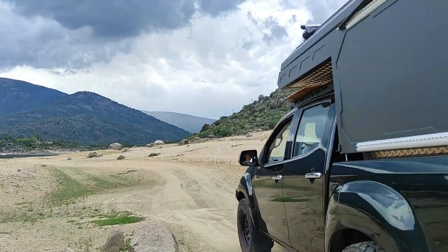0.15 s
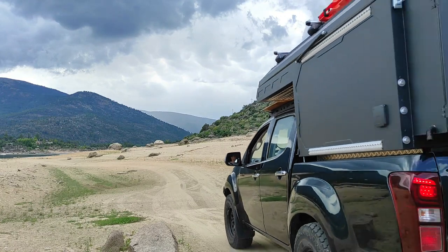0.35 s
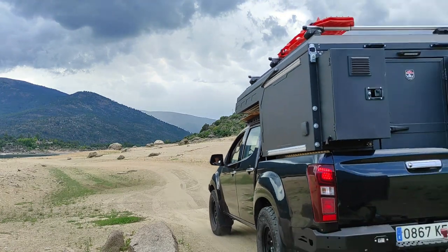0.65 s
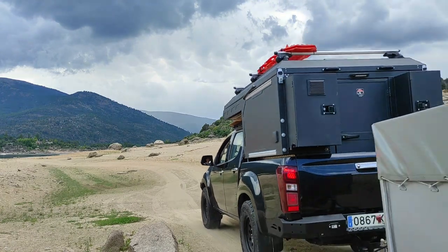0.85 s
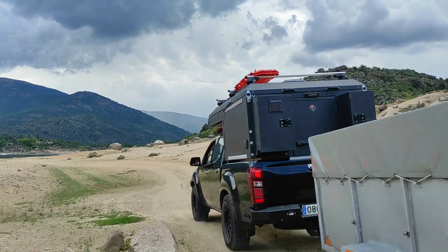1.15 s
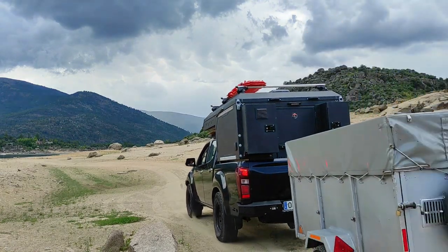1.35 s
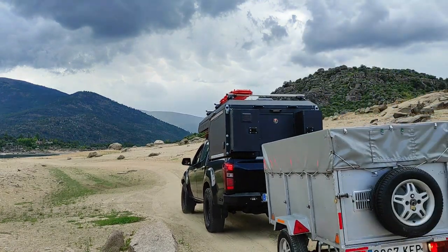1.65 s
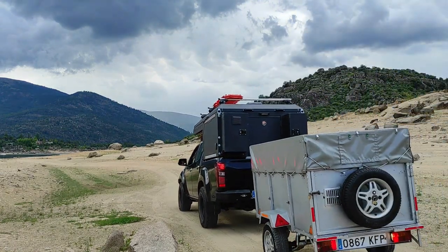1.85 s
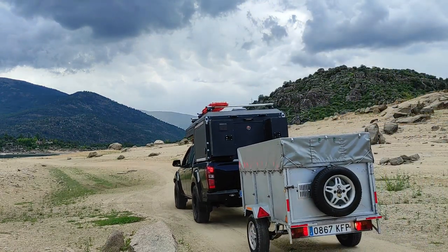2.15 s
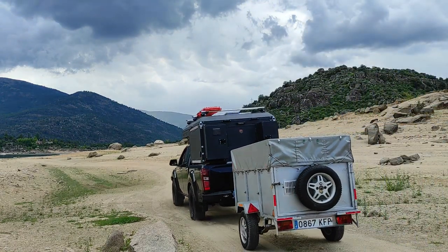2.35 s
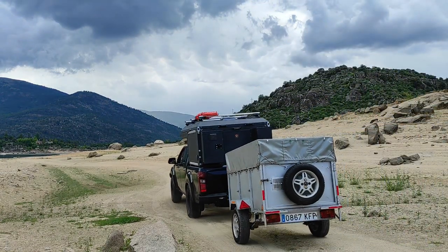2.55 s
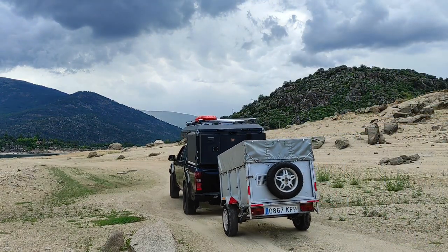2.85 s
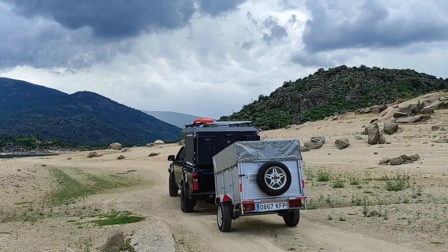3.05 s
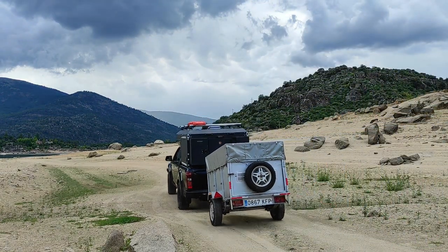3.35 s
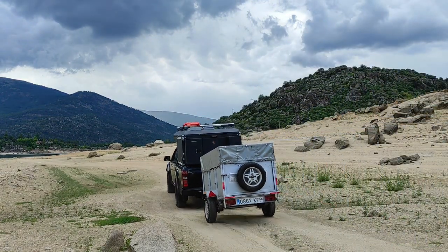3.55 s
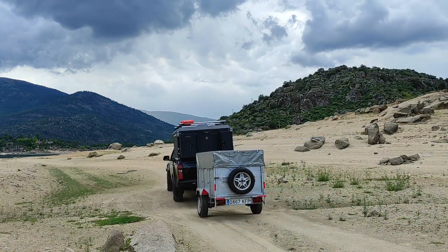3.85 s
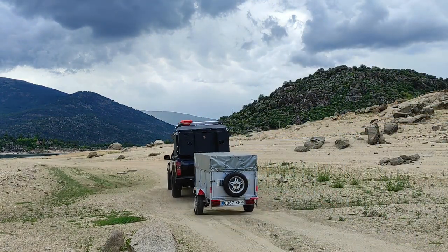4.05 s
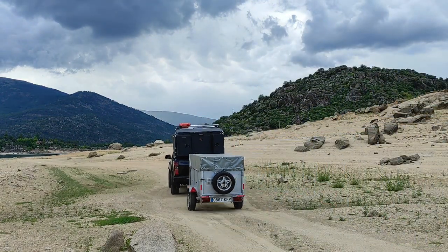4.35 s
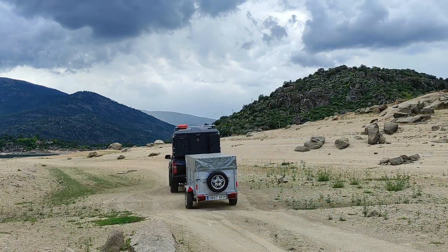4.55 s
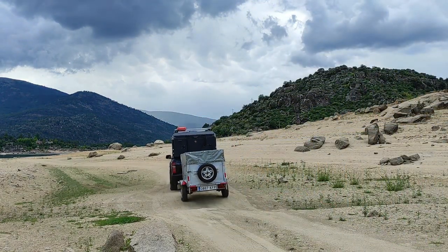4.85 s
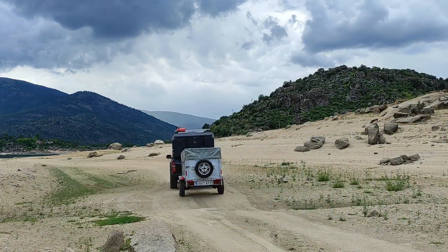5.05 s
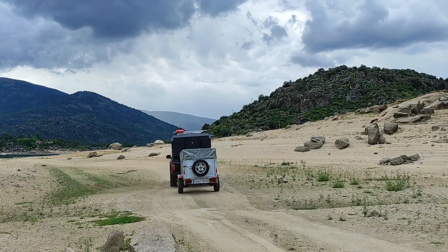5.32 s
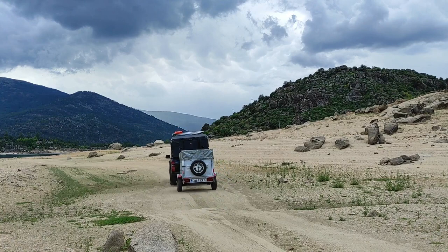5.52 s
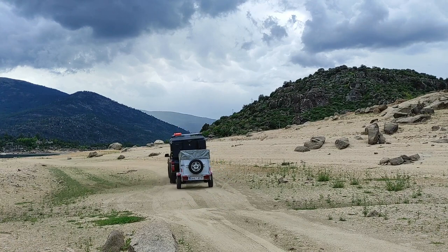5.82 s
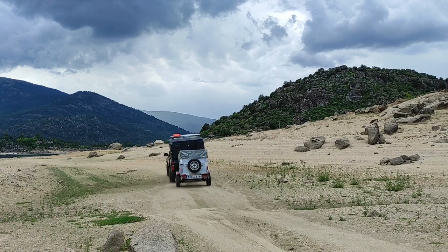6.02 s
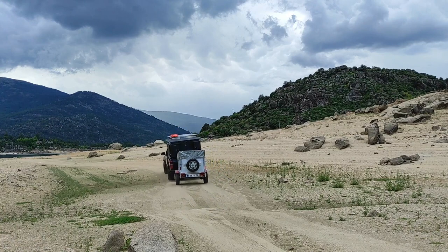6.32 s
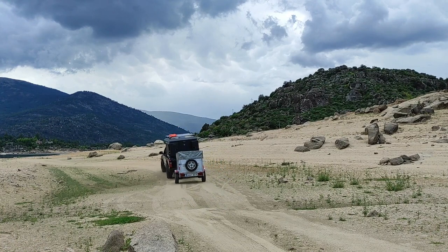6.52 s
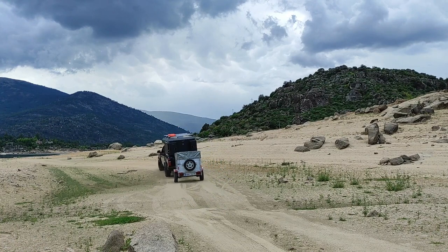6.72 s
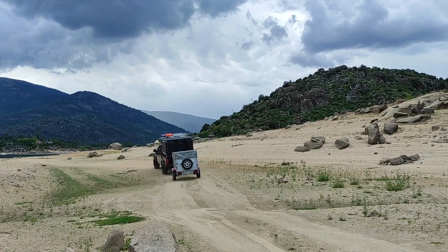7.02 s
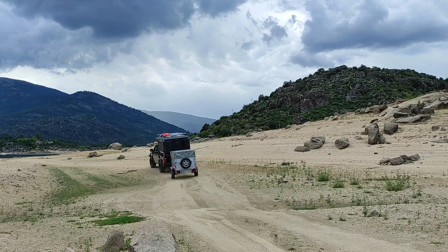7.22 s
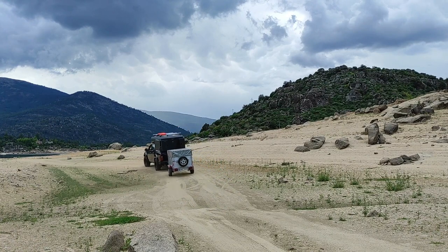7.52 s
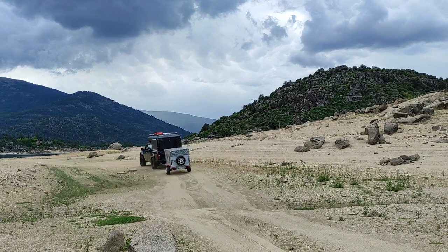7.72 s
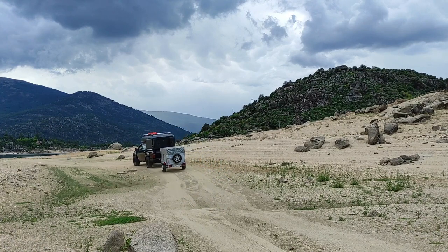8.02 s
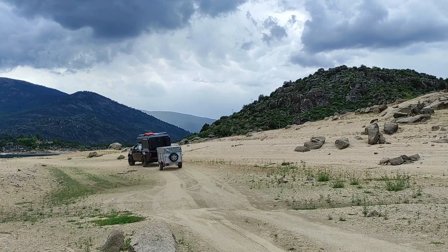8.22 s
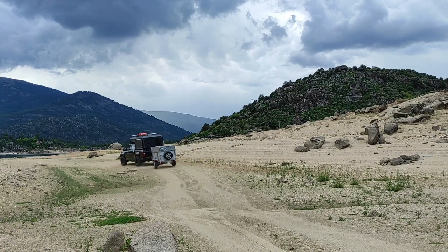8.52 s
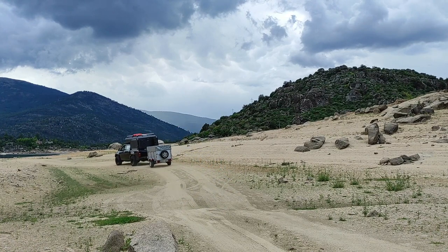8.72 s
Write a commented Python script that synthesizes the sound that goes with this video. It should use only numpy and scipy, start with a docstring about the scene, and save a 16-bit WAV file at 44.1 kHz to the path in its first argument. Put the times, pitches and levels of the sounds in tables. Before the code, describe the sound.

Outdoors in open country, a pickup passes close to a handheld phone, tyres crunching gravel over soft wind. A deep thud and hollow trailer boom come almost at once, then lighter clinks as it recedes. About four seconds in, ruts set off a dense burst of metallic slams and boxy booms lasting over a second, before quieter crunch, a faint diesel hum and a few distant knocks.

```python
"""A pickup tows a light sheet-metal trailer away from a phone along a sandy gravel track in open country.
Tyre crunch is noise modulated by random stone impacts; the diesel hum is a sum of crankshaft orders.
The trailer box booms as a bank of struck panel resonances, and loose fittings rattle as short noise bursts.
Decaying sines make tyre thuds and the short rings of stones and slammed fittings; thin tones, a faint
engine hum line and high squeals, swell and fade, and low noise is wind at the microphones."""
import sys
import numpy as np
from scipy import signal
from scipy.fft import rfft, irfft
from scipy.io import wavfile
from scipy.ndimage import uniform_filter1d, map_coordinates

SR = 44100
rng = np.random.default_rng(int(sys.argv[2]) if len(sys.argv) > 2 else 0)


def bounce(signal):
    """Save signal as a 16-bit WAV file at the path given by the first command-line argument."""
    frames = np.transpose(np.atleast_2d(signal))
    limited = np.clip(frames, -1, 1)
    pcm = np.round(limited * 32767).astype(np.int16)
    wavfile.write(sys.argv[1], SR, pcm)


N = 391608
T = np.arange(N) / SR  # time axis, s
HZ = np.maximum(np.arange(N // 2 + 1) * SR / N, 1)  # frequency axis, kept above zero

# Spectra are relative, because colour() normalises the filtered noise.
# Gravel crunch spectrum: frequency_hz, density_db [dB per Hz]
GRAVEL_SPECTRUM = [(50, -35), (100, -8.5), (200, 0.5), (330, -8.5), (500, -4), (950, -3), (1400, -7.5),
                   (2600, -14), (3300, -22.5), (4200, -38), (6500, -58), (10000, -100)]
# Sand hiss through the phone's port resonance: frequency_hz, density_db [dB per Hz]
GRIT_SPECTRUM = [(1500, -12), (3000, -2), (4200, -4), (5600, -3), (6500, -3), (7400, 1), (8400, -7.5),
                 (9800, -24.5), (11500, -23.5), (13000, -29), (15800, -46)]
# Low tyre rumble spectrum: frequency_hz, density_db [dB per Hz]
RUMBLE_SPECTRUM = [(20, -73), (40, -32), (60, 3), (75, 7.5), (120, 2), (200, -40), (400, -110)]
# Short rings: stones crack and slammed fittings clink: start_s, peak_db, pitch_hz
SHORT_RINGS = [(0.416, -14, 1520), (0.449, -16, 2570), (0.453, -19, 1380), (0.717, -17, 1500),
               (0.744, -17, 2600), (0.877, -11, 930), (1.28, -21, 990), (1.3958, -17, 1365),
               (1.543, -16.5, 1317), (1.9914, -21.5, 1650), (2.2915, -28, 3560), (2.2927, -23, 1500),
               (2.4044, -22.5, 1030), (2.5784, -23.5, 1410), (2.6379, -22.5, 1060), (4.19, -30, 2740),
               (4.363, -28, 7240), (4.379, -27, 1600), (4.393, -16, 8060), (4.406, -12, 7000),
               (4.849, -20, 7300), (4.877, -16, 7900), (4.9, -31, 7200), (4.926, -21, 7700),
               (4.928, -14.5, 1510), (5.14, -15.5, 5550), (5.142, -24, 3240), (5.215, -27, 5000),
               (5.276, -25, 7640), (5.323, -24, 7530), (5.493, -25, 8000), (5.453, -23, 2408),
               (7.912, -33, 1590)]
# How hard the ruts shake the rig: time_s, level_db
SHAKE_LEVEL = [(0.0, -33.5), (0.64, -42.5), (1.66, -43), (1.9, -44.5), (2.9, -45), (3.61, -44.5),
               (4.08, -36.5), (4.35, -34), (4.62, -36.5), (4.95, -34), (5.09, -35.5), (5.44, -30),
               (5.81, -40), (6.5, -43.5), (7.6, -45), (8.06, -41.5), (8.35, -41), (8.6, -41), (8.88, -42)]
# Crankshaft speed: time_s, speed_hz
CRANK_SPEED = [(0, 29.9), (5.5, 29.5), (5.85, 28.64), (6.1, 29.25), (6.46, 29.04), (6.54, 31.6),
               (6.72, 28.45), (7.8, 29.48), (8.88, 29)]
# Engine hum, sixth order: time_s, level_db
HUM_LEVEL = [(2.6, -51), (3.3, -46), (5.4, -44), (5.75, -56), (5.87, -36.5), (6.4, -40), (6.58, -44.5),
             (6.68, -57), (7.25, -54), (7.4, -46.5), (7.9, -45.5), (8.05, -50.5), (8.88, -49)]
# Brief dip of the low hum: centre_s, width_s, depth_db
LOW_HUM_DIP = (6.97, .15, -11)
# Wind gusts: time_s, level_db
WIND_LEVEL = [(0.0, -31), (1.16, -31.5), (1.5, -32.5), (1.76, -34), (1.88, -42.5), (2.07, -29.5),
              (2.17, -38.5), (2.3, -31.5), (2.4, -40.5), (3.46, -39), (4.03, -27.5), (4.53, -34),
              (4.75, -29), (6.1, -40), (6.75, -41.5), (8.88, -44)]
# Wind spectrum: frequency_hz, density_db [dB per Hz]
WIND_SPECTRUM = [(8.8, -35), (15, 7), (32, -2.5), (59, -2.5), (113, -12), (172, -10), (200, -9), (260, -55),
                 (440, -120)]
# Jolts that boom in the trailer box: start_s, reference_db, struck_panel_hz
BOX_JOLTS = [(0.462, -20.5, 270), (0.711, -13.5, 315), (0.731, -7, 262), (0.746, -14, 350),
             (0.792, -17, 225), (0.816, -15.5, 264), (0.87, -20, 345), (1.263, -26.5, 256),
             (2.411, -27, 277), (2.577, -25, 250), (4.128, -28, 240), (4.235, -18.0, 310),
             (4.259, -23, 241), (4.28, -25, 230), (4.385, -11, 261), (4.398, -7.5, 204), (4.41, -5.5, 292),
             (4.44, -12, 322), (4.492, -23, 214), (4.679, -17, 260), (4.722, -14.5, 292), (4.743, -15, 260),
             (4.768, -16.5, 250), (4.852, -15.5, 298), (4.931, -14.5, 237), (4.972, -10.5, 293),
             (5.001, -21, 298), (5.162, -14, 282), (5.195, -13, 243), (5.257, -13, 346), (5.284, -8, 279),
             (5.315, -12.5, 246), (5.329, -17, 255), (5.355, -11.5, 276), (5.554, -9, 304),
             (5.627, -18, 282), (5.689, -16.4, 251), (6.711, -22.5, 284), (7.292, -23, 263),
             (7.921, -17, 294), (8.077, -25, 270), (8.453, -22, 277.8), (8.57, -23.5, 245),
             (8.617, -22.5, 271)]
# Panel resonances of the box: centre_hz, width_hz, gain_db
PANEL_MODES = [(133.4, 42, -4), (177, 32.4, -0.5), (223, 29.7, 0.5), (252, 24.6, 2.5), (284, 47.5, -1),
               (360.4, 51, -4), (402.6, 39.6, -5), (501, 101, -10.5), (703, 780, -22)]
# Slams of loose fittings: start_s, reference_db, knock_over_reference_db
SLAMS = [(0.4494, -28.5, 17), (0.7154, -25.5, 25.5), (0.7393, -8, 6), (0.875, -30, 19.5), (0.9544, -25, 12),
         (1.0994, -20, -15), (1.2394, -19, -11), (1.28, -26.5, 12.5), (1.395, -25, 9.5), (1.542, -34, 10),
         (1.99, -49, 5), (2.2144, -30.5, 7), (2.2902, -32.5, 7), (2.5718, -29, 7.5), (4.0537, -28, -6),
         (4.078, -17, -7), (4.1205, -24.5, -10), (4.157, -25, -4), (4.1893, -22.5, -8), (4.2168, -32, 1),
         (4.2344, -22.5, -6), (4.362, -32, -18), (4.3794, -16, 0), (4.3933, -5, -10), (4.4094, -13, -15),
         (4.4394, -17, 7.5), (4.617, -20.5, -21), (4.6614, -21.5, -15), (4.7134, -17.5, 1),
         (4.7526, -25, -2), (4.848, -17.5, -1), (4.875, -9.5, -11), (4.9257, -16, 0), (5.1397, -11.5, -3.5),
         (5.1544, -12.5, 1), (5.1744, -16, 4), (5.2145, -24, -11), (5.2425, -18.5, 5.5), (5.2729, -12, -2),
         (5.3044, -15.5, 4), (5.3205, -14.5, 2), (5.4535, -25, -19), (5.4926, -29.5, -20),
         (5.5238, -23.5, 6), (5.5452, -23, 12.5), (5.556, -19.5, 4), (6.2417, -33.5, -13),
         (6.9042, -37, -10), (7.055, -36, 10.5), (7.2893, -30.5, -3), (7.4076, -35, -1), (7.912, -28, -1),
         (7.9678, -32, 6), (8.4143, -28, 5), (8.16, -39, 5), (8.565, -29, -1)]
# Bright clang spectrum: frequency_hz, density_db [dB per Hz]
CLANG_SPECTRUM = [(880, -42), (1500, 5.5), (1690, -1.5), (2820, -2.5), (4220, -8.5), (5780, -6.5),
                  (7770, 1), (9850, -21.5), (11600, -24), (13200, -28), (13900, -55), (15800, -39)]
# Dull knock spectrum: frequency_hz, density_db [dB per Hz]
KNOCK_SPECTRUM = [(150, -65), (400, 17), (700, 13), (1500, 6.5), (2400, -2.5), (4000, -28), (9000, -95)]
# A wheel drops into a hole and the tyre thuds: start_s, peak_db, pitch_hz, t60_s
TYRE_THUDS = [(.727, -4, 75.6, 0.18), (2.051, -15, 59, 0.084), (2.288, -19.5, 60, 0.1),
              (5.29, -23, 74.5, 0.98)]
# Thin tones: a faint engine hum line and high squeals swell and fade: start_s, end_s, pitch_hz, level_db
THIN_TONES = [(1.47, 1.68, 13440, -63), (3.1, 4.5, 540, -52), (4.03, 4.23, 6480, -54)]
# Likeness of the two ports: frequency_hz, share [0-1]
PORT_LIKENESS = [(25, 0), (60, 1), (130, 0.92), (300, 1), (640, 0.81), (1400, 0.71), (3000, 0.09),
                 (6000, 0.21)]
# Difference in colour of the two ports: frequency_hz, left_over_right_db
LEFT_OVER_RIGHT = [(60, 12), (110, 8.5), (200, 11), (380, 8.5), (700, 8), (1290, 7), (2380, 3.5), (4400, 3),
                   (8120, -7), (15000, 4)]

# The rig starts to the left and draws away, drifting slowly to the right.
SPEED_M_S, PASSES_S, BESIDE_M, DRIFT_M_S, TRAILER_BEHIND_M = 3.31, 0.088, 2.28, 0.26, 1.96
PORTS_APART_M, LEFT_LATE_S, SOUND_M_S = 0.12, .00007, 343
CALM_DB = -45  # reference for both shake and crunch
TYRES_1M_DB, TRAILER_TYRES_DB, FAR_HUSH_DB = -24.5, -5, -53.5  # truck tyres, trailer against truck, distant floor
TYRES_PER_SHAKE, RUMBLE_PER_SHAKE = 0.56, 1  # dB gained per dB of shake
GRIT_DB, GRIT_PER_CRUNCH, RUMBLE_DB = -56.5, 1.15, -53  # levels at calm; hiss fades faster with distance
PINGS, PING_DB, PING_LOW_HZ, PING_OCTAVES = 250, 7, 701.5, 2.2  # small stones; level against the crunch
SHORT_RING_T60_S = 0.022
# Order 2 swells, then order 3 takes over.
LOW_HUM_DB, LOW_HUM_SWELL_DB_S, LOW_HUM_JUMPS_S, LOW_HUM_AFTER_DB = -44.5, 1, 6.5, -44.5
CREST_DB = 9  # peaks of a noise burst above its rms
PUSH_DB, LOAD_DB, SHUDDER_DB = 18.5, -14, -1.5  # first push, shaken load and box shudder, against the jolt
PANEL_RING_DB, PANEL_RING_T60_S = 7, 0.067  # ring of the struck panel, against the jolt
SMALL_RATTLES, SMALL_SPREAD_DB, SMALL_KNOCK_DB = 450, 3, -6.5
SMALL_OVER_SHAKE_DB, SMALL_PER_SHAKE = -50.5, 1.58  # level in the calm, dB gained per dB of shake
CLANG_PATCHY_DB, CHATTER_DB = 3, 3  # spread between bands, spread within a slam
CRACK_DB, CRACK_LOW_HZ, CRACK_HIGH_HZ = 4.5, 600, 3960  # dry first contact of each slam
TOP_HZ = 15850


def undb(db):
    """Decibel law: twenty decibels are a factor of ten in amplitude."""
    return 10 ** (np.asarray(db) / 20)


def unit(x):
    """Normalisation to a root-mean-square amplitude of one."""
    return x / np.sqrt(np.mean(x ** 2))


def shape(table):
    """Logarithmic interpolation: a (Hz, value) table read at every frequency, straight on a log axis."""
    hz, value = np.transpose(table)
    return np.interp(np.log(HZ), np.log(np.maximum(hz, 1)), value)


def colour(x, table):
    """Spectral shaping: multiplication in the frequency domain filters the sound, then rms is set to one."""
    return unit(irfft(rfft(x) * undb(shape(table)), N))


def curves(table):
    """Linear interpolation in time of every column after the first."""
    s, *columns = np.transpose(table)
    return [np.interp(T, s, c) for c in columns]


def noise():
    """Incoherence: two unrelated noises serve the direct path and what the ground scatters."""
    return rng.standard_normal((2, N))


def walk(rate):
    """Slow random modulation: levels held 1 / rate seconds and slewed twice, with a spread near 1."""
    hold = int(SR / rate)
    steps = np.repeat(rng.standard_normal(N // hold + 1), hold)
    return 1.61 * uniform_filter1d(uniform_filter1d(steps, hold), hold)[:N]


def bursts(times, peak_db, t60, rise, tail_db=-90):
    """Exponential decay: a short rise, a fall and a weaker tail three times longer; powers of blows add."""
    t = T[:int(SR * 3 * t60)]
    onset = (1 - np.exp(-t / rise)) ** 2
    fall, tail = undb(-120 * t / t60), undb(-40 * t / t60)  # as power
    power = np.zeros(N + len(t))
    for s, db, after_db in np.broadcast(times, peak_db, tail_db):
        start = int(s * SR)
        power[start:start + len(t)] += undb(2 * db) * onset * (fall + undb(2 * after_db) * tail)
    return np.sqrt(power[:N])


def stones(rate, spread_db, tail):
    """Random impact process: many small hits and few large ones, each with a short decaying tail."""
    sizes = undb(spread_db * np.minimum(rng.exponential(size=N), 3))
    hits = (rng.random(N) < rate / SR) * sizes
    decayed = signal.lfilter([1], [1, -np.exp(-1 / (tail * SR))], hits)
    return unit(uniform_filter1d(decayed, size=24))


def rings(times, peak_db, hz, t60, rise, wobble):
    """Damped vibration: each blow starts a decaying sine, roughened by a phase wobble in radians."""
    out = np.zeros(N + SR)
    for s, db, f, fade in np.broadcast(times, peak_db, hz, t60):
        i = int(s * SR)
        t = T[:int(SR * min(fade, .9))][:N - i]
        envelope = undb(db - 60 * t / fade) * (1 - np.exp(-t / rise))
        out[i:i + len(t)] += envelope * np.sin(2 * np.pi * f * t + wobble[i:i + len(t)])
    return out[:N]


def tyres(truck_m, trailer_m, shake_db):
    """Inverse-distance law: crunch of truck and trailer tyres, with hiss, rumble, stone pings and short rings."""
    rough_db = shake_db - CALM_DB
    near = np.hypot(1 / truck_m, undb(TRAILER_TYRES_DB) / trailer_m)
    crunch_db = 20 * np.log10(np.hypot(undb(TYRES_1M_DB) * near, undb(FAR_HUSH_DB)))
    crunch_db = crunch_db + TYRES_PER_SHAKE * rough_db
    grit_db = GRIT_DB + GRIT_PER_CRUNCH * (crunch_db - CALM_DB)
    # crunch and hiss share part of their flicker through the ground
    ground = walk(9.1)
    crack = stones(150, 3.6, 0.0039)
    crunch = colour(noise() * (1 + 0.24 * crack) * undb(.5 * ground + 1.65 * walk(16)), GRAVEL_SPECTRUM)
    grains = stones(110, 1.0, 0.0075)
    grit = colour(noise() * (1 + 0.35 * grains) * undb(.5 * ground + 0.36 * walk(24.47)), GRIT_SPECTRUM)
    rumble = colour(noise(), RUMBLE_SPECTRUM)

    when, pitch, size = rng.random((PINGS, 3)).T
    ping_hz = PING_LOW_HZ * 2 ** (PING_OCTAVES * pitch)
    ping_db = crunch_db[(when * N).astype(int)] + PING_DB + 6.1 * size
    ping_db += shape(GRAVEL_SPECTRUM)[(ping_hz * N / SR).astype(int)]
    pings = np.transpose([when * N / SR, ping_db, ping_hz])
    # a stone rings only roughly, so its pitch wobbles fast
    short_rings = rings(*np.vstack([SHORT_RINGS, pings]).T, SHORT_RING_T60_S, 0.0015, 1.07 * walk(900))
    bed = crunch * undb(crunch_db) + grit * undb(grit_db)
    return bed + rumble * undb(RUMBLE_DB + RUMBLE_PER_SHAKE * rough_db) + short_rings


def engine():
    """Harmonic synthesis: engine orders are multiples of crankshaft speed, wavering in level and phase."""
    turn = 2 * np.pi * np.cumsum(curves(CRANK_SPEED)[0]) / SR
    after = 1 / (1 + np.exp((LOW_HUM_JUMPS_S - T) / 0.05))
    dip_s, width_s, dip_db = LOW_HUM_DIP
    dip = dip_db * np.exp(-((T - dip_s) / width_s) ** 2)
    second = (1 - after) * undb(LOW_HUM_DB - LOW_HUM_SWELL_DB_S * (LOW_HUM_JUMPS_S - T))
    third = after * undb(LOW_HUM_AFTER_DB + dip)
    sixth = undb(curves(HUM_LEVEL)[0])
    hum = np.zeros(N)
    for order, gain in [(2, second), (3, third), (6, sixth)]:
        level = np.sqrt(2) * gain * undb(1.67 * walk(14))
        hum += level * np.sin(order * turn + 0.045 * order * walk(10))
    return hum


def wind():
    """Turbulent pressure: low-frequency noise buffets the ports in gusty lumps."""
    return colour(noise() * undb(1.14 * walk(12)), WIND_SPECTRUM) * undb(curves(WIND_LEVEL)[0])


def box(shake_db):
    """Forced resonance: constant shaking, single blows and the shudder after them drive the panel modes."""
    s, db, hz = np.transpose(BOX_JOLTS)
    shudder = bursts(s - .009, db + SHUDDER_DB - CREST_DB, 0.17, 0.0026, tail_db=-4.5)
    drive = noise() * (shudder + undb(shake_db + 2.16 * walk(14)))
    # a soft push, low-passed at 500 Hz, starts each jolt
    push = np.zeros(N)
    push[((s - .004) * SR).astype(int)] = undb(db + PUSH_DB)
    drive = drive + irfft(rfft(push) / (1 + 1j * HZ / 500) ** 2, N)

    panels = 0
    for k, (f, width, gain_db) in enumerate(PANEL_MODES):
        detuning = (HZ / f - f / HZ) * f / width
        panels = panels + (-1) ** k * undb(gain_db) / (1 + 1j * detuning)  # neighbours in opposite sign
    # the panels radiate little bass and little treble
    panels = panels * 1j * HZ / (110 + 1j * HZ) / (1 + 1j * HZ / 1200) ** 2
    panels = panels / np.sqrt(np.mean(abs(panels) ** 2))
    struck = rings(s, db + PANEL_RING_DB, hz, PANEL_RING_T60_S, 0.0073, 0.48 * walk(60))
    return irfft(rfft(drive) * panels, N) + struck


def patchy(x, db, rate):
    """Band-wise modulation: overlapping half-octave bands from 1 kHz up, the end ones open, walk in level."""
    place = np.clip(2 * np.log2(HZ / 1000), 0, 7)
    spectrum = rfft(x)
    out = 0
    for k in range(8):
        band = irfft(spectrum * np.maximum(1 - abs(place - k), 0), N)
        out = out + band * undb(db * walk(rate))
    return out


def fittings(shake_db):
    """Impact excitation: a slam is a dry crack, a bright clang and a duller knock; small ones are random."""
    when, size = rng.random((SMALL_RATTLES, 2)).T
    rough_db = shake_db[(when * N).astype(int)] - CALM_DB
    # louder in the ruts, with few large ones
    small_db = SMALL_OVER_SHAKE_DB + SMALL_PER_SHAKE * rough_db - SMALL_SPREAD_DB * np.log(1 - .9 * size)
    small = np.transpose([when * N / SR, small_db, np.full(len(when), SMALL_KNOCK_DB)])
    s, db, knock_db = np.vstack([SLAMS, small]).T

    # each slam strikes another part, so the colour changes band by band
    clang = patchy(colour(noise(), CLANG_SPECTRUM), CLANG_PATCHY_DB, 30)
    clang = clang * bursts(s, db - CREST_DB, 0.067, 0.00037, tail_db=-6.0)
    clang = clang * (0.31 + 0.32 * stones(250, CHATTER_DB, 0.005))

    slam = bursts(s, db + knock_db - CREST_DB, 0.12, 0.0021, tail_db=-4.0)
    jolt_s, jolt_db, _ = np.transpose(BOX_JOLTS)
    load = bursts(jolt_s, jolt_db + LOAD_DB, 0.096, 0.0021)
    knock = colour(noise(), KNOCK_SPECTRUM) * np.hypot(slam, load)
    knock = knock * (0.41 + 0.19 * stones(150, 3.6, 0.0063))

    contact = np.zeros(N)
    contact[(s * SR).astype(int)] = undb(db + np.clip(knock_db, -10, 10) + CRACK_DB)
    band = signal.butter(2, [CRACK_LOW_HZ, CRACK_HIGH_HZ], "band", fs=SR, output="sos")
    return clang + knock + signal.sosfilt(band, contact)


def thuds():
    """Damped oscillation: each tyre thud is a low sine that decays exponentially."""
    return rings(*np.transpose(TYRE_THUDS), 0.0016, np.zeros(N))


def thin_tones():
    """Amplitude and phase modulation: thin sines swell and fade while level and phase waver."""
    out = np.zeros(N)
    for start, end, hz, db in THIN_TONES:
        swell = np.sin(np.pi * np.clip((T - start) / (end - start), 0, 1)) ** 2
        out += undb(db + 2 * walk(30.48)) * swell * np.sin(2 * np.pi * hz * T + 0.5 * walk(90))
    return out


def scene():
    """Superposition and partial coherence: the sources add, then reach two ports by delay and scattering."""
    shake_db = curves(SHAKE_LEVEL)[0]
    ahead, beside = SPEED_M_S * (T - PASSES_S), BESIDE_M - DRIFT_M_S * T
    truck_m = np.hypot(ahead, beside)
    trailer_m = np.hypot(ahead - TRAILER_BEHIND_M, beside)
    rig = tyres(truck_m, trailer_m, shake_db) + engine() + box(shake_db) + fittings(shake_db)
    direct, scattered = rig + thuds() + thin_tones() + wind()

    # the right port hears the direct sound earlier or later with the bearing of the trailer
    left_late = LEFT_LATE_S - PORTS_APART_M / SOUND_M_S * beside / trailer_m
    shifted = map_coordinates(direct, [np.arange(N) + left_late * SR], order=3, mode="nearest")
    like = shape(PORT_LIKENESS)
    right = like * rfft(shifted) + np.sqrt(1 - like ** 2) * rfft(scattered)
    ratio = undb(-shape(LEFT_OVER_RIGHT))
    # share the level between the ports, allowing for their likeness
    gain = 2 / np.sqrt(1 + ratio ** 2 + 1.15 * like * ratio)
    return irfft(np.array([gain * rfft(direct), gain * ratio * right]), N)


def record(dry):
    """Saturation and band-limiting: the phone rounds the loudest peaks and cuts the top."""
    rounded = np.tanh(1.051 * dry) / 1.117
    return signal.sosfilt(signal.ellip(10, .2, 80, TOP_HZ, fs=SR, output="sos"), rounded)


dry = scene()
out = record(dry)
bounce(out)
```